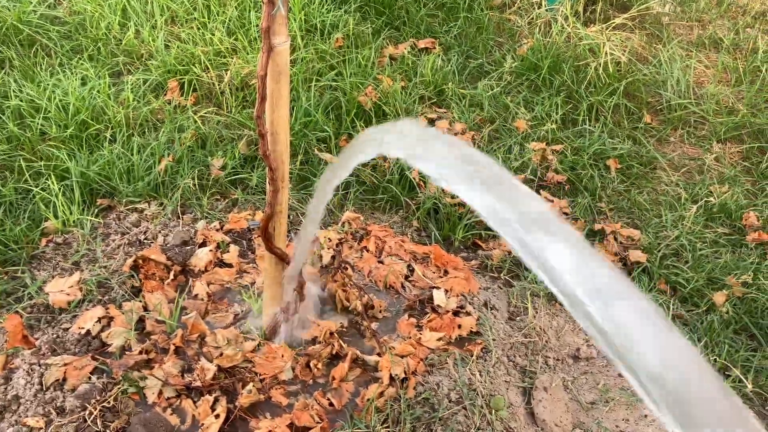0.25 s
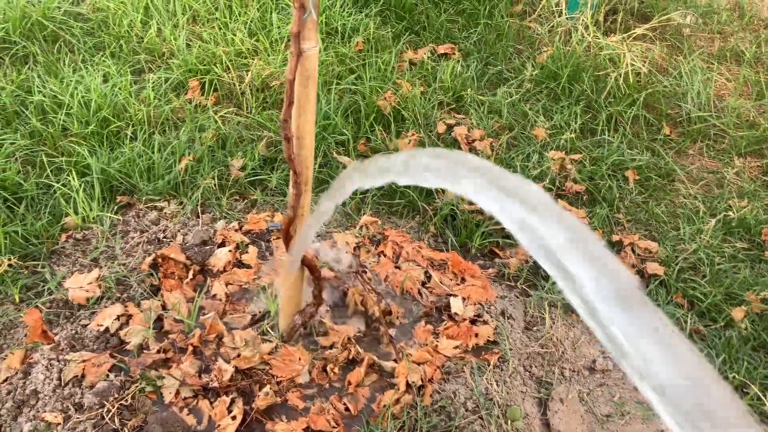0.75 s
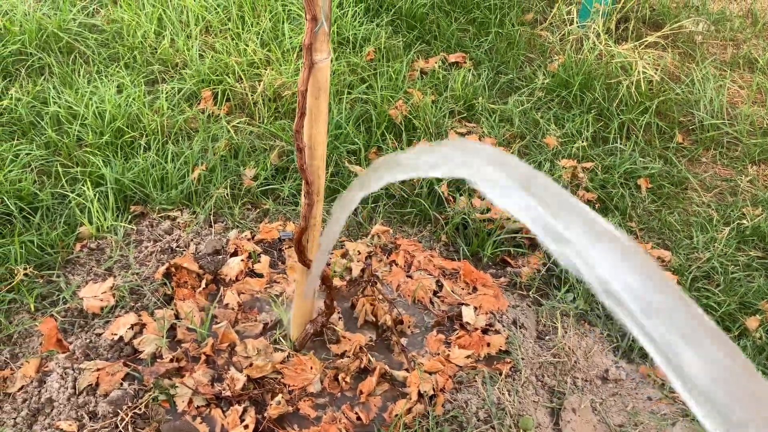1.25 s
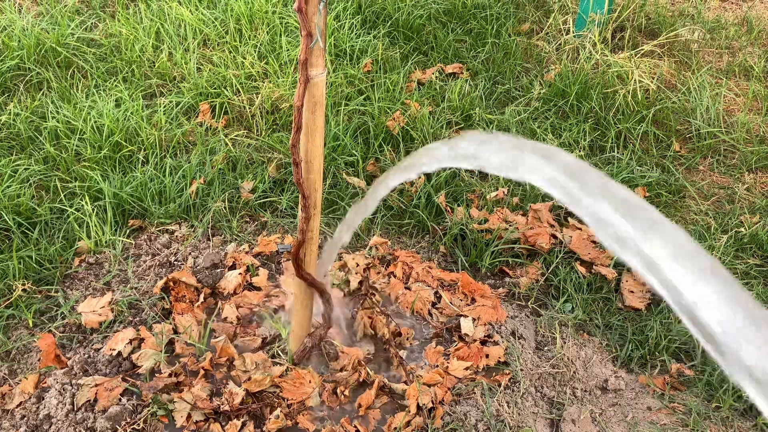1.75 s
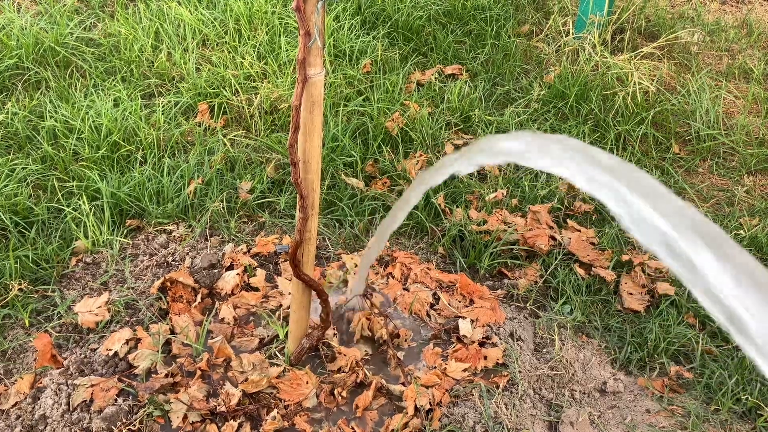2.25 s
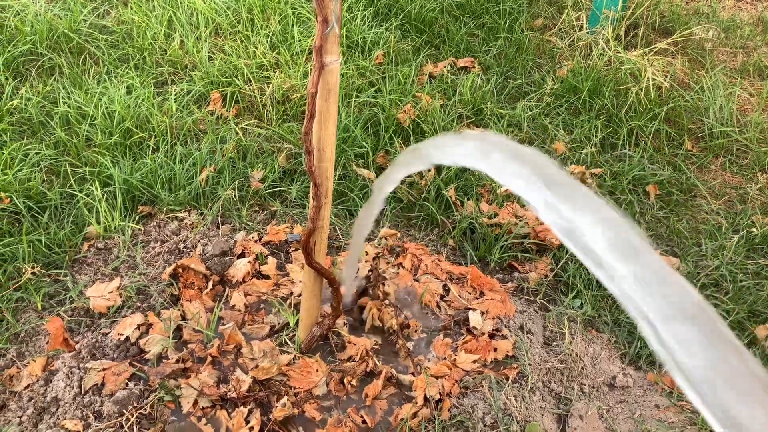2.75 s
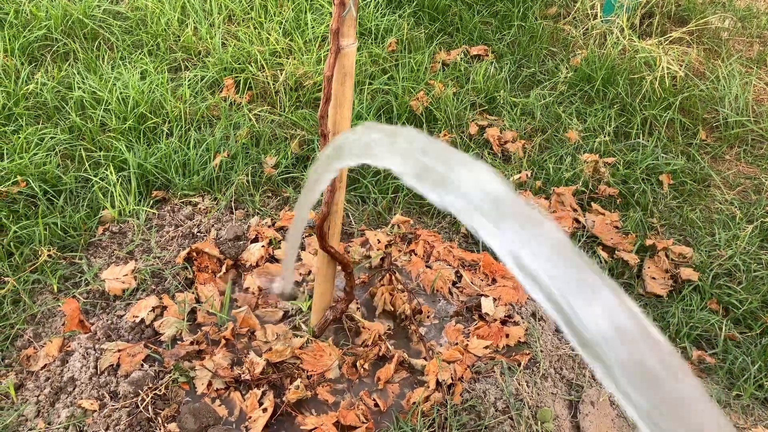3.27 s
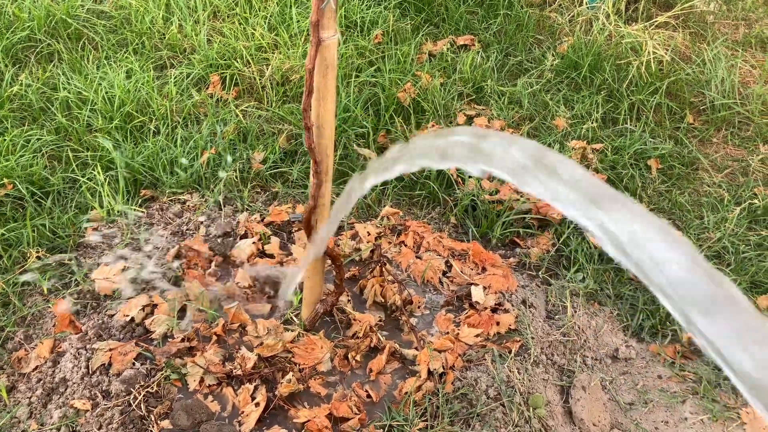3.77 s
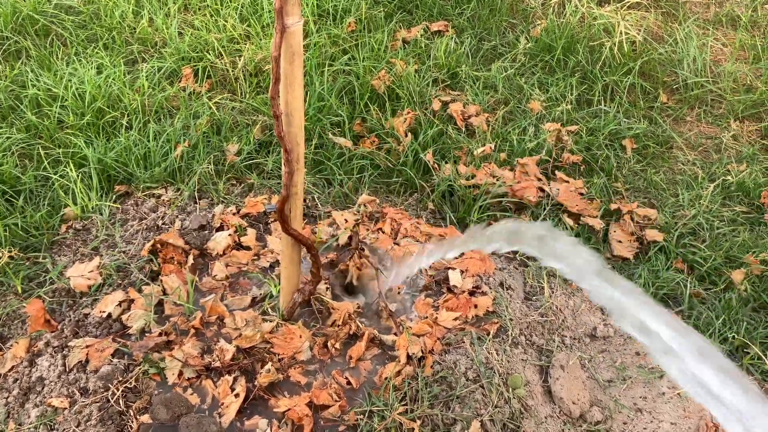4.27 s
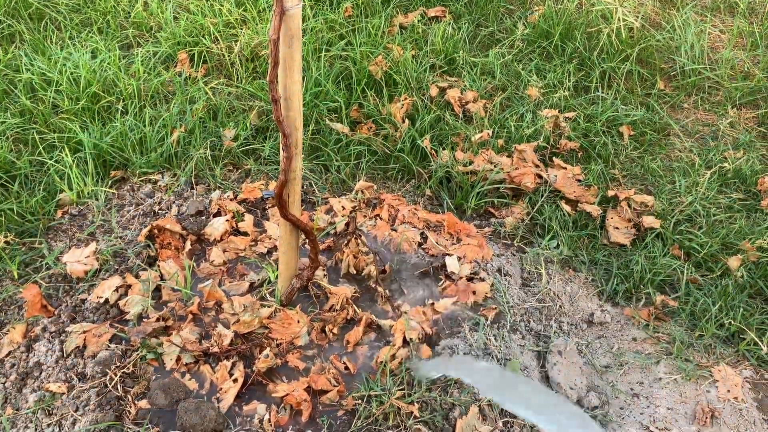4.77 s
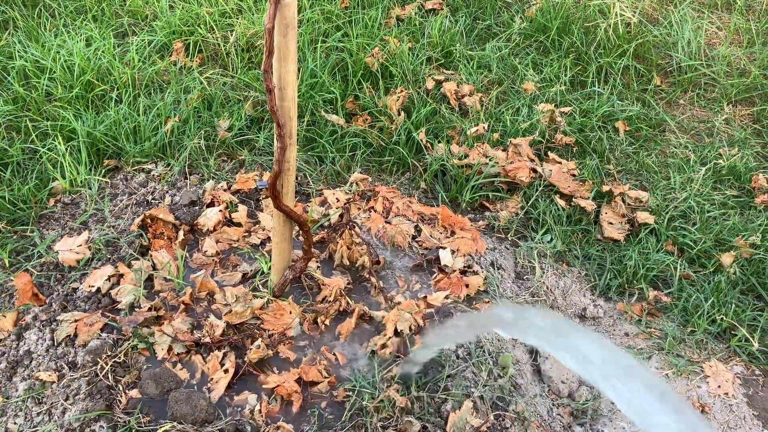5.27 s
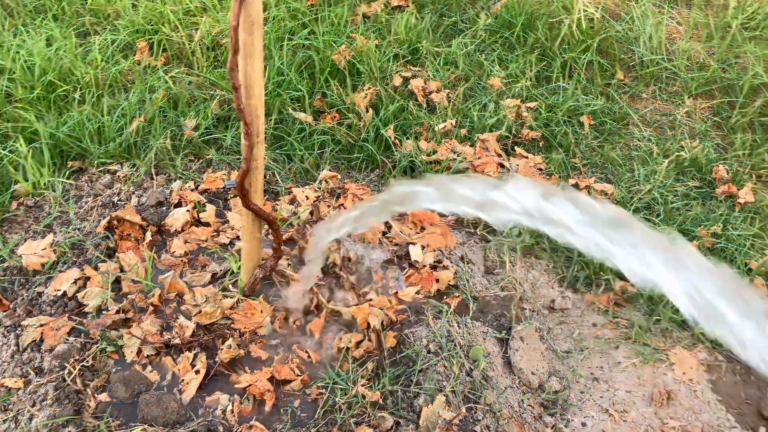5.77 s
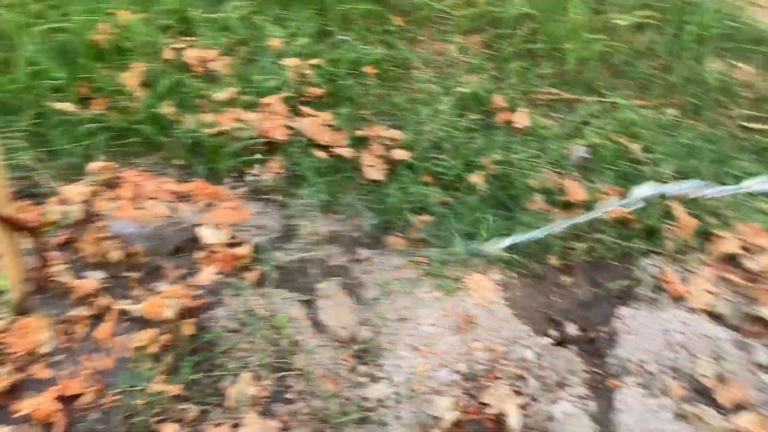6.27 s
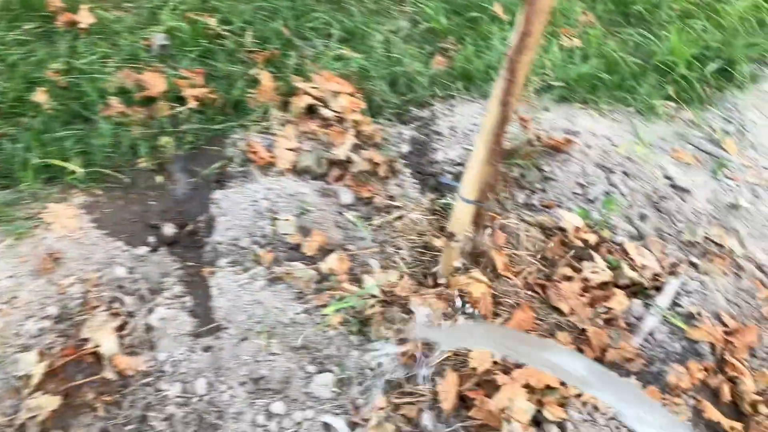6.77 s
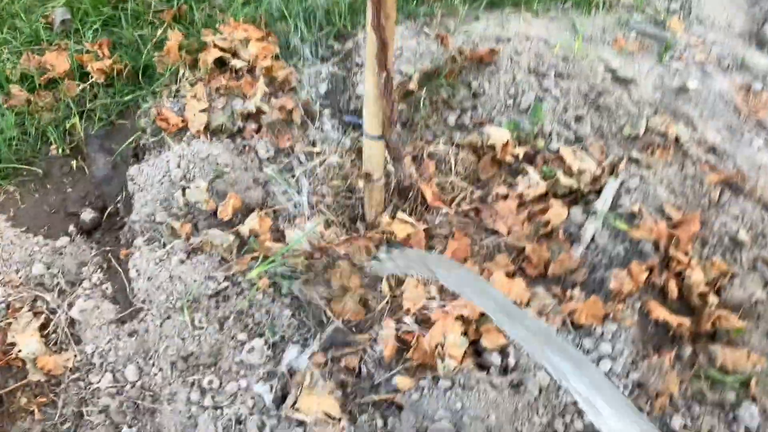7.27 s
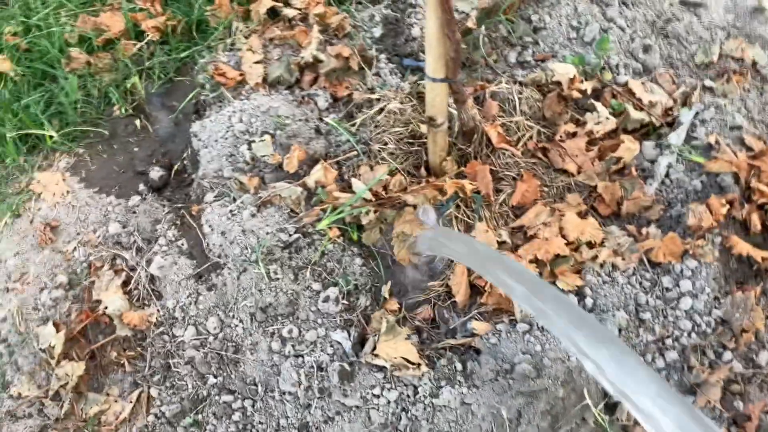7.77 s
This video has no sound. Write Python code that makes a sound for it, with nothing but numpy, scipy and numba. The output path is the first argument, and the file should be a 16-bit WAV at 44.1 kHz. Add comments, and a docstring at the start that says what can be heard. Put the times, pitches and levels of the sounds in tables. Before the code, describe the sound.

A thick hose jet gushes and splatters onto wet soil and dry leaves, with slaps and gurgles, over a low distant pump-engine thud.

```python
"""Among saplings on soil and dry leaves, a thick hose jet plunges down beside one stem, then swings to the next.
Random bursts of force ring trapped air bubbles for its thud and churn; droplet ticks make the splatter and spray.
Single lumps slap and smack, large air pockets glug, and a slow single-cylinder pump engine thuds some way off
as decaying pipe resonances. A closely spaced microphone pair adds a ground echo and a moving phase difference."""
import sys
import numpy as np
from scipy import signal
from scipy.fft import rfft, irfft
from scipy.io import wavfile
from numba import njit

SR = 44100
rng = np.random.default_rng(int(sys.argv[2]) if len(sys.argv) > 2 else 0)


def digitize_waveform(pressure):
    """Quantize a signal to 16-bit integers and store it at the path in sys.argv[1].

    Rows of a 2-D input are taken as channels; values are limited to [-1, 1].
    """
    field = np.atleast_2d(pressure).T
    bounded = np.clip(field, -1, 1)
    quanta = np.round(bounded * 32767).astype(np.int16)
    wavfile.write(sys.argv[1], SR, quanta)


N = 353770
TIME = np.arange(N) / SR
BAND_EDGE_HZ = 15900

# The pump engine hunts about its speed: time_s, firings_per_s
PUMP_SPEED = [(0.0, 19.467), (0.2, 20.286), (0.6, 19.335), (0.8, 19.777), (1.6, 19.911), (2.21, 19.578),
              (2.81, 20.046), (3.01, 19.688), (3.61, 19.601), (4.01, 19.965), (4.41, 19.464),
              (4.81, 20.226), (5.01, 19.468), (6.82, 19.996), (7.02, 19.472), (8.02, 19.876)]
# Exhaust resonances rung by each firing: pitch_hz, mean_level_db, swell_s
EXHAUST_RESONANCES = [(107, 0, 0.0093), (193.3, -12.5, 0.0079)]
# Colour of the engine's unsteady rumble: frequency_hz, relative_density_db
RUMBLE_COLOUR = [(25, -29), (42, -5.5), (62, 4.5), (100, -3.5), (170, -4.5), (250, -8.5), (350, -29)]
INTAKE_DELAY_S = 0.02327
PUMP_ASIDE_DB = -0.5  # scattered part over shared part: the pump stands to one side

# Large air pockets that glug up through the puddle: start_s, level_db, pitch_hz
AIR_GLUGS = [(0.611, -33, 350), (1.843, -37, 710), (1.865, -27, 1230), (1.869, -34.5, 590),
             (1.933, -34, 480), (2.581, -34, 400), (2.72, -46, 313), (4.108, -34, 865), (4.136, -25, 1090),
             (4.221, -30, 1100), (4.313, -28, 1740), (4.455, -28.5, 810), (4.493, -31, 900),
             (4.513, -30.5, 770), (6.231, -36.5, 297), (7.586, -31, 980)]
GLUG_CYCLES, GLUG_RISE = 0.82, 0.013  # cycles to the loudest moment; share by which pitch rises in that time
# Lumps that burst flat on the stem or hard ground: start_s, level_db
FLAT_SMACKS = [(0.607, -23), (1.2148, -17), (1.7988, -12.5), (2.9715, -21), (4.253, -21), (6.2205, -24.5),
               (6.345, -21), (6.7977, -22)]
# Single lumps of water, each trapping air and throwing up spray: start_s, level_db, pitch_hz, spray_level_db
LUMP_SLAPS = [(0.586, -20, 1050, -38), (0.738, -14, 3080, -31), (1.031, -20, 2400, -29),
              (1.212, -16, 1690, -24), (1.665, -22.5, 980, -21.5), (1.748, -14.5, 1580, -38),
              (1.796, -9, 2600, -17.5), (1.837, -14, 1440, -24), (1.843, -19.5, 1050, -32),
              (1.863, -15.5, 1190, -33), (2.356, -24, 1710, -18), (2.465, -21, 2350, -23),
              (2.501, -17.5, 1150, -43), (2.534, -15.5, 1520, -26), (2.581, -12, 3350, -29),
              (2.68, -22, 1520, -17), (2.969, -13, 1800, -37), (3.07, -11, 3500, -43),
              (3.078, -14, 2300, -40), (3.303, -22.5, 1090, -23.5), (3.499, -18, 4300, -24),
              (3.516, -11.5, 4540, -28), (3.589, -10, 4240, -26), (3.618, -24, 1420, -20.5),
              (4.078, -11.5, 1320, -44), (4.151, -16, 1400, -40), (4.449, -18, 1110, -45),
              (4.551, -13, 4120, -44), (4.604, -12, 4230, -27), (4.702, -17.5, 1390, -39),
              (5.425, -12.5, 1760, -26), (5.461, -11, 1630, -43), (5.869, -20, 1150, -29),
              (5.892, -20, 2360, -19.5), (6.106, -11, 3270, -33), (6.303, -20, 3300, -33),
              (6.343, -20.5, 2040, -21), (6.417, -21, 5100, -24), (6.795, -11.5, 3650, -37),
              (7.271, -21.5, 1830, -24), (7.287, -22, 2900, -26), (7.321, -21, 1790, -30),
              (7.337, -14, 2850, -24), (7.77, -11.5, 4100, -24.5), (7.817, -9.5, 4420, -33)]
SLAP_T60_S = 0.023
SLAP_BELOW, SLAP_ABOVE = 0.52, 2  # band edges of the splat, as ratios to the pocket's pitch

# Weight of the water on the soil: time_s, relative_level_db
WATER_WEIGHT = [(0.0, -52.5), (1.3, -48), (1.6, -51.5), (2.7, -49), (3.5, -55.5), (4.2, -50), (4.8, -54.5),
                (6.0, -56), (6.55, -59.5), (8.02, -54)]
# How hard the jet churns the puddle as the hose is aimed about: time_s, relative_level_db
PUDDLE_CHURNING = [(0.0, -42), (0.5, -42), (0.75, -43), (1.35, -43), (1.62, -46), (1.7, -41), (2.1, -40.5),
                   (2.95, -39), (3.4, -44.5), (4.25, -37.5), (4.75, -45.5), (5.0, -39.5), (5.4, -41.5),
                   (5.7, -43.5), (6.1, -40.5), (6.26, -58.5), (7.0, -45.5), (7.45, -47.5), (8.02, -38)]
# Puddle depth at the landing point: time_s, big_over_small_bubbles_db
PUDDLE_DEPTH = [(0.0, -2.5), (2.7, -0.5), (3.1, -6), (4.4, 1.5), (4.9, -7), (5.5, -4), (6.0, -0.5),
                (6.7, -4.5), (8.02, -6.5)]
SPLATTER_DB, SPRAY_DB = -42, -39.5  # steady splashing, before the changes below
# The jet strays onto stem or dry leaves and splashes more: start_s, length_s, splatter_change_db, spray_change_db
STRAY_SPLASHES = [(0.2, 0.11, 3.5, 2.5), (0.46, 0.15, 4, 3), (0.69, 0.35, 3.5, 0.5), (1.05, 0.39, 3.5, -1),
                  (1.58, 0.25, 2.5, 2), (2.25, 0.47, 2, 2), (2.9, 0.11, 3.5, 1.5), (3.04, 0.15, 4, 3.5),
                  (3.8, 0.17, 4.5, 1), (4.26, 0.11, 4, 0.5), (4.47, 0.13, 2.5, 0.5), (4.86, 0.49, 1.3, 1.7),
                  (6.07, 0.052, 5.5, 6.5), (6.41, 0.09, 2.5, 1), (6.61, 0.13, 3, 2), (7.06, 0.18, 3, 3.5),
                  (7.77, 0.12, 1.5, 2.5)]
# The jet plunges into standing water and gurgles: start_s, length_s, churn_change_db
WATER_PLUNGES = [(0.57, 0.035, 3), (2.06, 0.078, 1.5), (2.5, 0.064, 1), (2.7, 0.056, 2.5), (4.09, 0.071, 3),
                 (4.69, 0.027, 4.5), (5.41, 0.23, 1.5), (5.85, 0.18, 2.5), (6.94, 0.037, 3.5),
                 (7.57, 0.091, 1.5)]
# The jet thins or breaks as the hose is jerked: start_s, length_s, thud_and_churn_change_db, splashing_change_db
JET_BREAKS = [(0.33, 0.05, 2, -2), (0.67, 0.1, -4.5, 1.5), (1.55, 0.11, -3, -0.5), (1.885, 0.084, -1.5, -3),
              (2.15, 0.073, -0.5, -3), (2.77, 0.12, -1, -2.5), (3.27, 0.21, -0.5, -3.5),
              (3.66, 0.11, -1.5, -1), (4.035, 0.056, -11, -1), (6.16, 0.083, 1, -8), (6.25, 0.11, -0.5, -2),
              (6.53, 0.08, -5, -1.5)]
# dB per dB of a plunge: favours bigger bubbles, thuds harder, swallows some of the splash
PLUNGE_DEEPENS, PLUNGE_THUDS, PLUNGE_SWALLOWS = 1, 1, 0.73
# Length of the straight ramps centred on each event's start and end (s)
SPLASH_RISE_S, SPLASH_FALL_S = 0.023, 0.031
PLUNGE_RISE_S, PLUNGE_FALL_S = 0.013, 0.073
BREAK_RISE_S, BREAK_FALL_S = 0.072, 0.014

# Colour of the water's thud on the soil: frequency_hz, relative_density_db
THUD_COLOUR = [(120, 2), (230, -1), (330, -1.5), (500, -0.5), (700, -1.5), (1100, -8)]
# Colour of the big bubbles: frequency_hz, relative_density_db
BIG_BUBBLE_COLOUR = [(400, -8.5), (600, -10.5), (800, -3.5), (1100, -0.5), (1350, -6.5), (1800, -15.5)]
# Colour of the small bubbles: frequency_hz, relative_density_db
SMALL_BUBBLE_COLOUR = [(1000, -28.5), (1350, -4.5), (1600, 0.5), (2200, -3), (2700, -3.5), (4000, -24)]
# Colour of the splatter on mud and leaves: frequency_hz, relative_density_db
SPLATTER_COLOUR = [(900, -11.5), (1900, -2.5), (2600, -3.5), (3400, 1.5), (4300, -1), (5200, -5),
                   (6200, -2.5), (9000, -15.5)]
# Colour of the finest drops: frequency_hz, relative_density_db
SPRAY_COLOUR = [(3500, -8.5), (5500, -11), (7000, 2.5), (8200, 4.5), (10000, 3.5), (12500, 2.2), (14200, 1),
                (15700, -0.5)]

# The landing point moves, and with it the arrival times: time_s, left_lead_s (positive is left first)
ARRIVAL_LEAD = [(0, 9.2e-05), (0.6, 7.2e-05), (1.5, 6.2e-05), (2.75, 2.6e-05), (3.25, 8.4e-05),
                (3.7, 9.5e-05), (4.5, 0.0), (5.45, 2e-06), (5.98, 0.00011), (6.14, 6.5e-05), (6.35, -3e-05),
                (6.39, -0.000155), (6.45, -0.000118), (6.55, -8.2e-05), (6.62, -6e-06), (7.1, 4.6e-05),
                (7.7, 0.0), (8.02, 1e-05)]
# Share of that lead felt at each frequency: frequency_hz, share_ratio
LEAD_SHARE = [(20, 0.67), (1900, 0.89), (2600, 0.86), (4000, 1.03), (6000, 1.017), (7200, 0)]
# Hard bare soil round the second sapling reflects more: time_s, echo_strength_ratio
GROUND_ECHO = [(0, 0.035), (4, 0.054), (5, 0.12), (6.2, 0.23), (6.8, 0.49), (8.02, 0.76)]
# Likeness of the two channels before opposition acts: frequency_hz, likeness_ratio
PAIR_LIKENESS = [(100, .97), (500, .9), (1800, .92), (3000, .8), (6400, .72), (7300, .84), (8200, .72),
                 (10300, .66), (11100, .97), (11650, .97), (12400, .63), (14700, .6), (15400, .96)]
# Phase of the pair when no lead is felt: frequency_hz, left_lead_rad
PAIR_PHASE = [(20, 0), (2000, 0), (3100, .7), (4200, 0), (5600, .8), (7300, 0), (8800, -3.0), (9550, -3.3),
              (11100, -6.15), (11700, -6.4), (13200, -9.3), (14200, -9.55), (15400, -12.5)]
# Balance of the pair: frequency_hz, left_over_right_db
PAIR_BALANCE = [(100, -1.4), (200, -1.2), (350, .7), (1200, 1.3), (3000, .3), (5000, 0)]
OPPOSED_LEAK = 0.04  # share of the scattered power left where the ports are in opposite phase


def gain_of(db):
    """Logarithmic level: 20 dB is a factor of ten in amplitude."""
    return 10 ** (np.asarray(db) / 20)


def evened(x):
    """Root-mean-square normalisation: scales a signal to rms 1."""
    return x / np.sqrt(np.mean(x ** 2) + 1e-20)


def along(rows, at=TIME, axis=1):
    """Linear interpolation: reads one column of a table against its first."""
    columns = np.transpose(rows)
    return np.interp(at, columns[0], columns[axis])


def coloured(x, spectrum):
    """Linear filtering: weights the spectrum, with 12 dB per octave skirts beyond its ends; rms 1."""
    hz = np.fft.rfftfreq(N, 1 / SR) + 1
    f, db = np.transpose(spectrum)
    skirts = np.minimum(hz / f[0], 1) ** 2 * np.minimum(f[-1] / hz, 1) ** 2
    weight = skirts * gain_of(np.interp(np.log(hz), np.log(f), db))
    return evened(irfft(rfft(x) * weight, N))


def wander(top_hz):
    """Band-limited random fluctuation: noise rolled off below about 12 Hz and above top_hz; rms 1."""
    hz = np.fft.rfftfreq(N, 1 / SR)
    weight = hz ** 2 / (hz ** 2 + 150) / (1 + (hz / top_hz) ** 2)
    return evened(irfft(rfft(rng.standard_normal(N)) * weight, N))


def impacts(per_s, spread_db, channels=2):
    """Poisson-like arrivals: random impulses whose levels in dB follow a capped exponential law."""
    size = gain_of(spread_db * np.minimum(rng.exponential(1, (channels, N)), 4.5))
    return size * (rng.random((channels, N)) < per_s / SR)


def add(mix, s, sound):
    """Superposition: adds a sound to the mix at time s."""
    part = mix[max(round(s * SR), 0):][:len(sound)]
    part += sound[:len(part)]


def throb(hz, db, swell_s):
    """Pipe resonance: a tone swells and decays, its strength varying at random from call to call."""
    t = np.arange(4096) / SR
    envelope = (t / swell_s * np.exp(1 - t / swell_s)) ** 2
    return gain_of(db + 0.62 * rng.standard_normal()) * envelope * np.sin(2 * np.pi * hz * t)


def pump():
    """Periodic excitation: firings ring the exhaust and then the weaker intake, over a broad rumble."""
    turns = np.cumsum(along(PUMP_SPEED)) / SR - .467
    beat = np.zeros(N)
    for s in TIME[1:][np.diff(np.floor(turns)) > 0]:
        add(beat, s, throb(*EXHAUST_RESONANCES[1]) - throb(*EXHAUST_RESONANCES[0]))
        add(beat, s + INTAKE_DELAY_S, -throb(172.6, -8.5, 0.0036))
    rumble = coloured(rng.standard_normal((2, N)), RUMBLE_COLOUR)
    # the slope of the beat gives a small difference between the microphones
    aside = gain_of(PUMP_ASIDE_DB) * evened(np.gradient(beat))
    return gain_of(-45.5) * np.array([evened(beat), aside]) + gain_of(-51.0) * rumble


def glugs():
    """Volume pulsation: a large air pocket swells, rings and rises in pitch."""
    out = np.zeros(N)
    for s, level_db, hz in AIR_GLUGS:
        age = np.arange(4096) / SR * hz / GLUG_CYCLES  # 1 at the loudest moment
        tone = np.sin(2 * np.pi * GLUG_CYCLES * age * (1 + GLUG_RISE * age / 2))
        add(out, s, gain_of(level_db) * age * np.exp(1 - age) * tone)
    return out


def smacks():
    """Impulse response: a lump bursting flat gives one dry, wide-band crack."""
    out = np.zeros(N)
    band = signal.butter(1, [450, 5500], "band", fs=SR, output="sos")
    crack = signal.sosfilt(band, signal.unit_impulse(512))
    for s, level_db in FLAT_SMACKS:
        add(out, s, gain_of(level_db) * crack / crack.max())
    return out


def slaps():
    """Impact and cavity resonance: a lump cracks, rings its trapped air and throws up a spray burst."""
    out, t = np.zeros(N), np.arange(2048) / SR
    fine = signal.butter(2, 5000, "high", fs=SR, output="sos")
    tick = signal.sosfilt(fine, signal.unit_impulse(len(t)))
    burst = (1 - np.exp(-t / 0.0019)) * gain_of(-60 * t / SLAP_T60_S)
    for s, level_db, hz, spray_db in LUMP_SLAPS:
        edges = [hz * SLAP_BELOW, min(hz * SLAP_ABOVE, BAND_EDGE_HZ)]
        wet = signal.butter(3, edges, "band", fs=SR, output="sos")
        crack = signal.sosfilt(wet, signal.unit_impulse(len(t)))
        splat, mist = rng.standard_normal((2, len(t)))
        add(out, s + .0005, burst * gain_of(level_db - 12.5) * evened(signal.sosfilt(wet, splat)))
        add(out, s + 0.00049, burst * gain_of(spray_db + 3.5) * signal.sosfilt(fine, mist))
        # the pocket's pitch glides upward from hz
        pocket = t * hz * np.exp(1 - t * hz) * np.sin(2 * np.pi * hz * t * (1 + 12 * t))
        hit = 0.28 * pocket + 0.36 * crack / abs(crack).max()
        add(out, s + 0.001507, gain_of(level_db) * hit)
        add(out, s + .002, gain_of(spray_db + 9.5) * tick)
    return out


@njit
def rung(side, start, size, turn, life, rise, length):
    """Damped oscillation: sums soft-starting, upward-gliding tones (turn in rad/sample, life in samples)."""
    out = np.zeros((2, length))
    for i in range(len(start)):
        z, step = size[i] + 0j, np.exp(1j * turn[i] - 1 / life[i])
        glide = np.exp(2j * turn[i] * rise / life[i])
        soft, opening = 1.0, np.exp(-turn[i] / np.pi)
        for k in range(start[i], min(start[i] + int(5 * life[i]), length)):
            out[side[i], k] += z.imag * (1 - soft)
            z, step, soft = z * step, step * glide, soft * opening
    return out


def bubbles(low_hz, high_hz, per_s, spread_db, cycles, rise, force):
    """Bubble resonance: air pockets of random size ring, rising in pitch as they near the surface."""
    born = impacts(per_s, spread_db) * force
    side, start = np.nonzero(born)
    pitch, ring = rng.random((2, 2, N))[:, side, start]
    hz = low_hz * (high_hz / low_hz) ** pitch
    life_s = cycles * (0.48 + 1.46 * ring) / hz
    turn = 2 * np.pi * hz / SR
    return evened(rung(side, start, born[side, start] * hz, turn, life_s * SR, float(rise), N))


def drops(per_s, spread_db, mist):
    """Shot noise: sharp droplet ticks over a mist of countless smaller ones."""
    ticks = impacts(per_s, spread_db) * rng.choice([-1, 1], (2, N))
    return evened(ticks) + mist * rng.standard_normal((2, N))


def lumps(per_s, spread_db, fade_s, steady):
    """Jet break-up: lumps land as short decaying bursts of power over a steady share."""
    t = np.arange(2048) / SR
    hits = impacts(per_s, spread_db, channels=1)[0]
    power = signal.oaconvolve(hits ** 2, np.exp(-t / fade_s))[:N]
    return evened(np.sqrt(abs(power / power.mean()) + abs(steady)))


def held(events, rise_s, fall_s, axis=2):
    """Superposed level changes in dB: each ramps in, holds and ramps out."""
    total = np.zeros(N)
    for row in events:
        start_s, end_s = row[0], row[0] + row[1]
        ramp = np.minimum((TIME - start_s) / rise_s, (end_s - TIME) / fall_s)
        total += row[axis] * np.clip(.5 + ramp, 0, 1)
    return total


def landing():
    """Partition of the jet's force: levels of thud, churn, splatter and spray, and bubble balance (dB)."""
    core = held(JET_BREAKS, BREAK_RISE_S, BREAK_FALL_S)
    plunge = held(WATER_PLUNGES, PLUNGE_RISE_S, PLUNGE_FALL_S)
    airborne = held(JET_BREAKS, BREAK_RISE_S, BREAK_FALL_S, axis=3) - PLUNGE_SWALLOWS * plunge
    return (along(WATER_WEIGHT) + core + PLUNGE_THUDS * plunge,
            along(PUDDLE_CHURNING) + core + plunge,
            SPLATTER_DB + airborne + held(STRAY_SPLASHES, SPLASH_RISE_S, SPLASH_FALL_S),
            SPRAY_DB + airborne + held(STRAY_SPLASHES, SPLASH_RISE_S, SPLASH_FALL_S, axis=3),
            along(PUDDLE_DEPTH) + PLUNGE_DEEPENS * plunge)


def fine_spray(splash, scatter, cracks, surge):
    """Droplet shot noise: the finest drops land in showers of their own among ringing froth."""
    showers = drops(per_s=5000, spread_db=3.0, mist=0.7) * splash ** 0.5 * scatter ** 1.1
    froth = bubbles(6047, 15160, per_s=1200, spread_db=0.5, cycles=41, rise=0.0081, force=scatter)
    spray = evened(showers) + 0.28 * cracks + .5 * froth
    return coloured(spray * gain_of(0.35 * surge), SPRAY_COLOUR)


def rim_splatter(splash, cracks, surge):
    """Impact noise and bubble resonance: the jet's rim breaks on mud and leaves, with fizz and plinks."""
    ticks = evened(drops(per_s=3200, spread_db=4.0, mist=0.42) * splash ** .7)
    fizz = bubbles(2200, 8000, per_s=800, spread_db=2.8, cycles=16, rise=0.01, force=1)
    plinks = bubbles(1800, 5200, per_s=60, spread_db=1.8, cycles=2.2, rise=.01, force=splash)
    splatter = ticks + 0.38 * cracks + 0.61 * fizz + 0.19 * plinks
    return coloured(splatter * gain_of(0.91 * surge), SPLATTER_COLOUR)


def puddle_churn(plunge, splash, cracks, surge, depth_db):
    """Air entrainment: the jet's core drives bubbles into the puddle, bigger ones where it is deeper."""
    ringing = bubbles(540.0, 2925, per_s=1300, spread_db=-0.5, cycles=2.37, rise=0.029, force=plunge)
    ticks = 1.13 * splash * drops(per_s=2000, spread_db=6.0, mist=0.29)
    churn = (ringing + ticks) * gain_of(0.7 * surge) + 0.35 * cracks
    big = gain_of(depth_db)
    both = big * coloured(churn, BIG_BUBBLE_COLOUR) + coloured(churn, SMALL_BUBBLE_COLOUR)
    return both / np.hypot(1, big)


def soil_thud(plunge):
    """Low bubble resonance: the weight of the plunging core rings large, quickly damped air pockets."""
    thud = bubbles(196.7, 890, per_s=720, spread_db=0.5, cycles=0.94, rise=0.026, force=plunge)
    return coloured(thud, THUD_COLOUR)


def water():
    """Common modulation: one uneven flow drives all parts; row 0 is shared by the pair, row 1 scattered."""
    thud_db, churn_db, splatter_db, spray_db, depth_db = landing()
    surge = wander(top_hz=39.0)
    plunge = lumps(per_s=200, spread_db=3.0, fade_s=0.0052, steady=0.76)
    splash = lumps(per_s=470, spread_db=1.5, fade_s=0.0067, steady=0.15)
    scatter = lumps(per_s=470, spread_db=1.5, fade_s=0.0006, steady=0.98)
    # big drops burst on dry leaves for about a millisecond, heard in churn, splatter and spray at once
    cracks = lumps(per_s=40, spread_db=2.8, fade_s=0.0009, steady=0) * rng.standard_normal((2, N))
    return (fine_spray(splash, scatter, cracks, surge) * gain_of(spray_db)
            + rim_splatter(splash, cracks, surge) * gain_of(splatter_db)
            + puddle_churn(plunge, splash, cracks, surge, depth_db) * gain_of(churn_db - 2.5)
            + soil_thud(plunge) * gain_of(thud_db + 1.5))


def microphones(sound):
    """Interference and coherence: two ports receive shared and scattered sound with echo and phase."""
    hz, t, spectra = signal.stft(sound, SR, nperseg=512)
    # a small patch of ground mirrors mainly the middle range, 1.05 ms late
    mirror = along([(200, 0.28), (400, 0.57), (2200, 0.13), (3500, 0.11)], hz)
    echo = np.exp(-2j * np.pi * hz * 0.00105) * mirror
    spectra = spectra * (1 + np.outer(echo, along(GROUND_ECHO, t)))
    # sound from one side is a little louder around 5.4 kHz
    lead = along(ARRIVAL_LEAD, t)
    sideways = np.outer(np.exp(-((hz - 5400) / 1300) ** 2), abs(lead) / abs(lead).max())
    shared, scattered = spectra * gain_of(1.9 * sideways)
    # the lead's phase folds back at half a cycle
    folded = np.arccos(np.cos(2 * np.pi * np.outer(hz, lead)))
    swing = np.minimum(folded * along(LEAD_SHARE, hz)[:, None], np.pi)
    phase = np.sign(lead) * swing + along(PAIR_PHASE, hz)[:, None] * (1 - swing / np.pi)
    # opposed ports keep little scattered sound: a hollow that sweeps as the hose swings
    opposed = ((1 - np.cos(phase)) / 2) ** 2
    apart = (1 - along(PAIR_LIKENESS, hz)[:, None]) / 2 * (1 - (1 - OPPOSED_LEAK) * opposed)
    shared, scattered = shared * np.sqrt(1 - apart), scattered * np.sqrt(apart)
    port = np.exp(.5j * phase) * gain_of(along(PAIR_BALANCE, hz)[:, None] / 2)
    pair = np.array([(shared + scattered) * port, (shared - scattered) / port])
    return signal.istft(pair, SR, nperseg=512)[1][:, :N]


def scene():
    """Superposition in the open air: the pump behind, the water and its single events close by."""
    events = np.array([glugs() + smacks() + slaps(), np.zeros(N)])
    return microphones(pump() + events + water())


def record(dry):
    """Band limitation: a linear-phase low-pass filter removes the highest treble."""
    lowpass = signal.firwin(511, BAND_EDGE_HZ, window=("kaiser", 9), fs=SR)
    return signal.oaconvolve(dry, lowpass[None], "same")


dry = scene()
out = record(dry)
digitize_waveform(out)
```